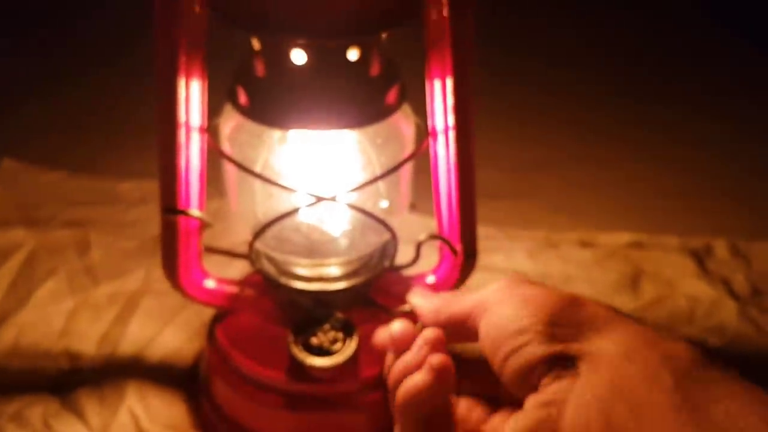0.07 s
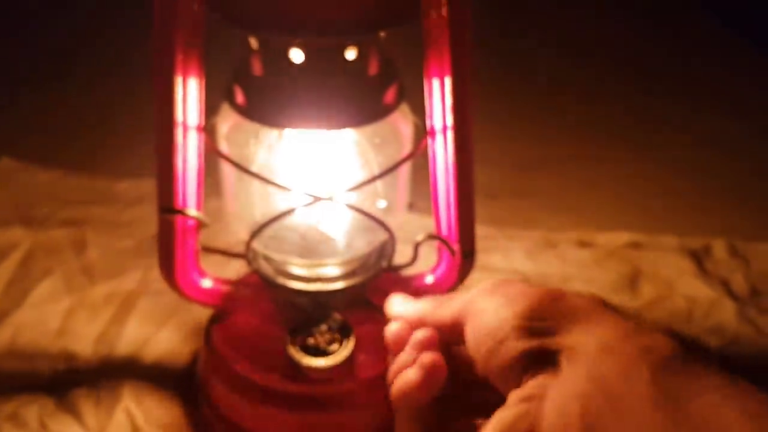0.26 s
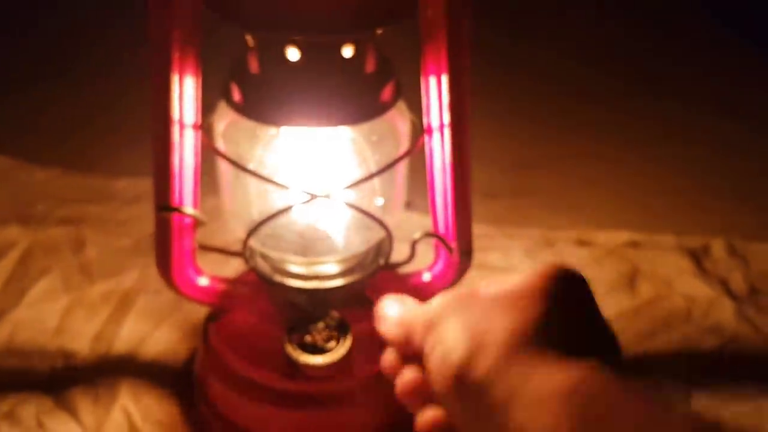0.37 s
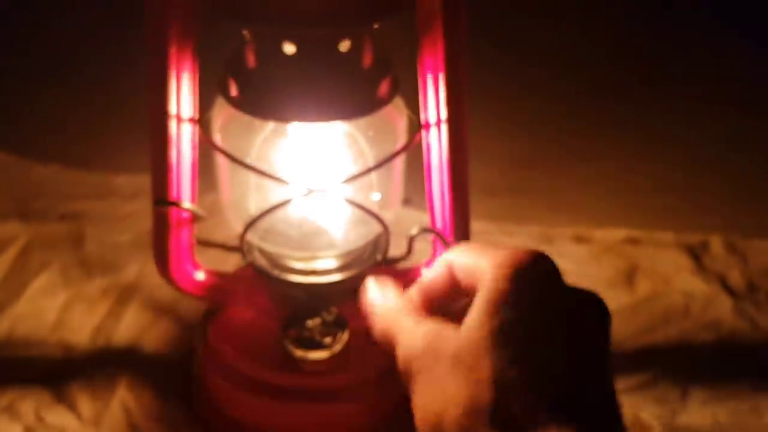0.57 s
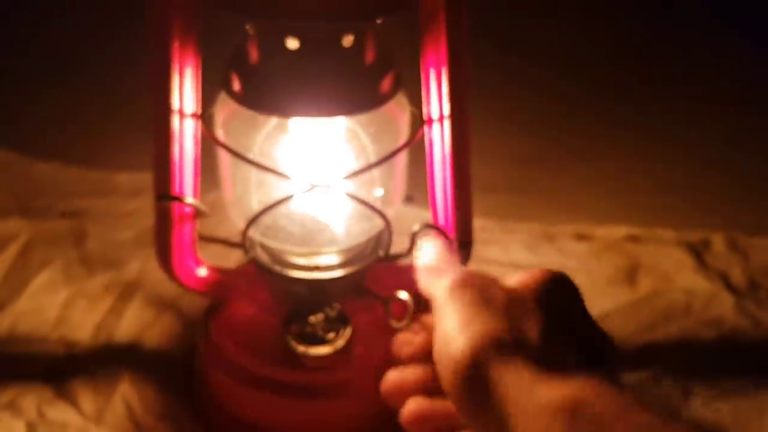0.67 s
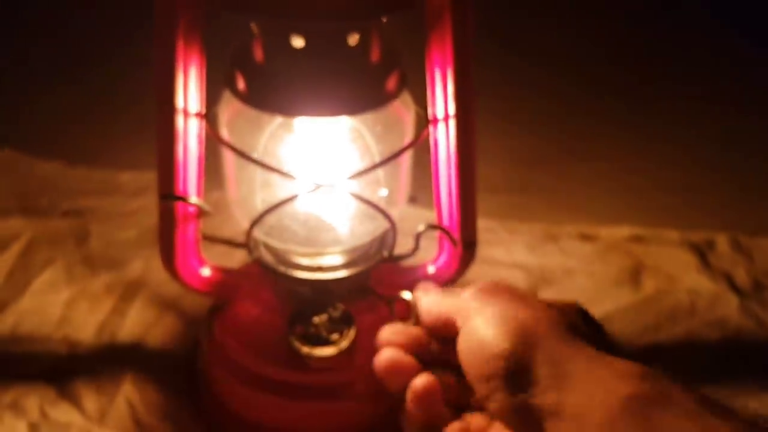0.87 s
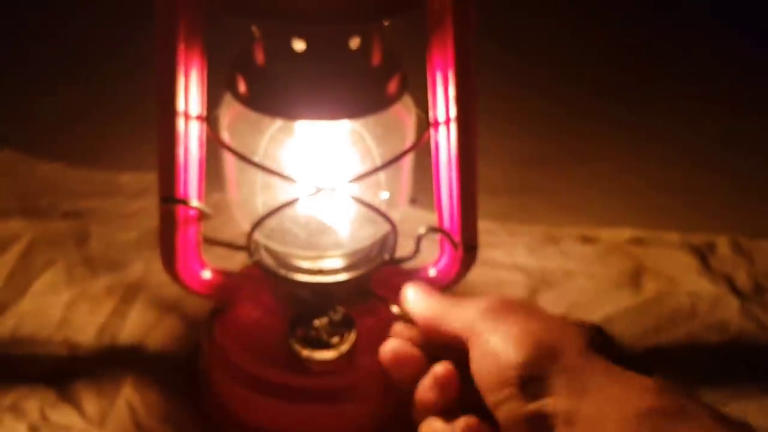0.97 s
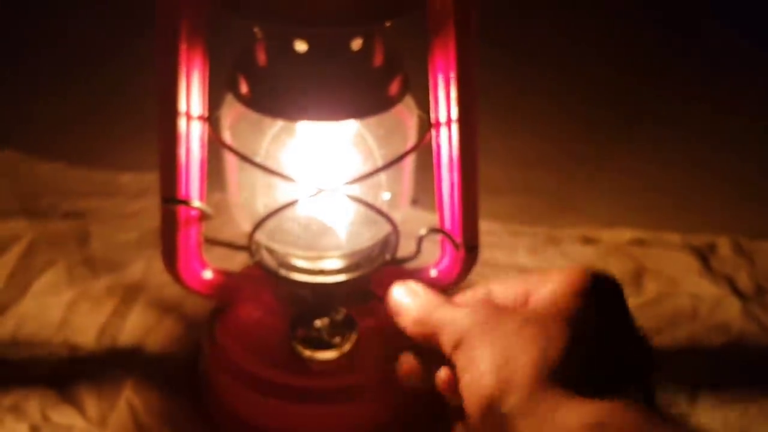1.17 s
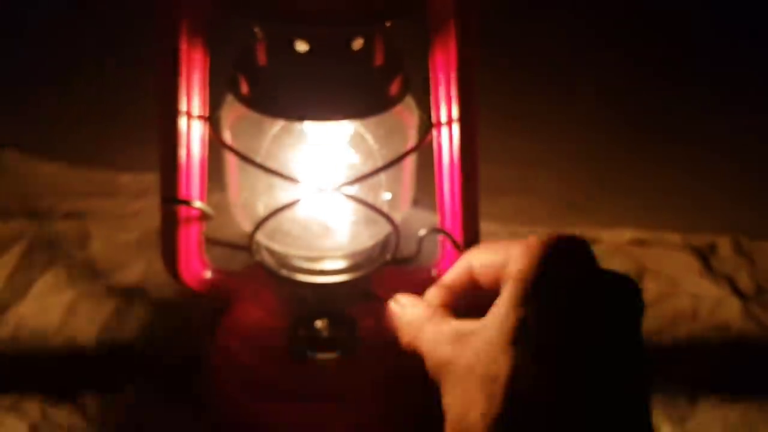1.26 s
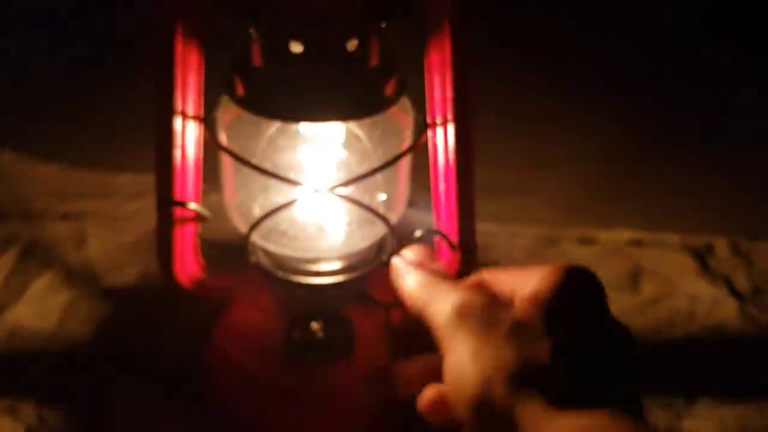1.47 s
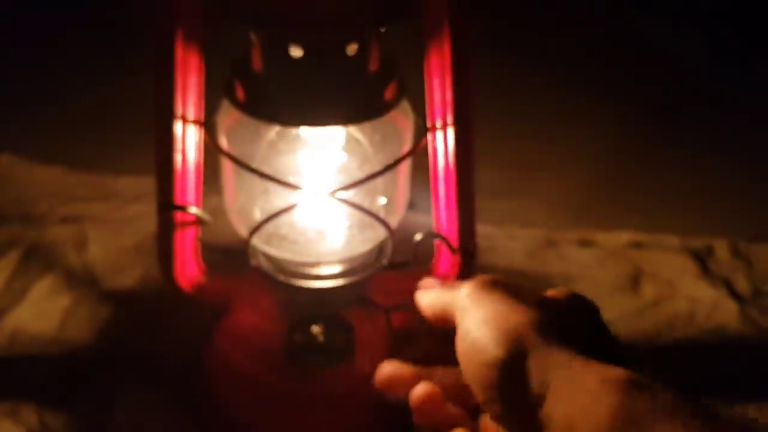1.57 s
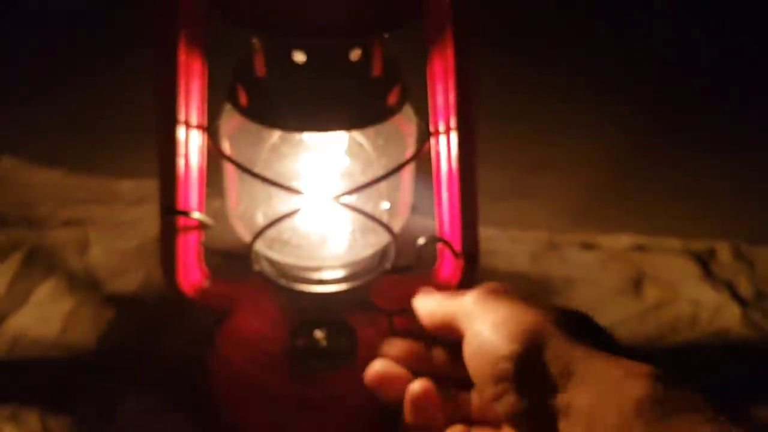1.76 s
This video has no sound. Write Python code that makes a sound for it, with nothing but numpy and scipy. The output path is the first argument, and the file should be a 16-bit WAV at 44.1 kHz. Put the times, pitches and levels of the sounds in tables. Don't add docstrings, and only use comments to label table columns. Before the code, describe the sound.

Lantern knob ratchets with a hard burst of metal ticks, then a soft knock and faint clicks

```python
import sys
import numpy as np
from scipy import signal
from scipy.fft import rfft, irfft
from scipy.io import wavfile

SR = 44100
rng = np.random.default_rng(int(sys.argv[2]) if len(sys.argv) > 2 else 0)


def inscribe(sig):
    pcm = np.round(np.clip(np.atleast_2d(sig).T, -1, 1) * 32767)
    wavfile.write(sys.argv[1], SR, pcm.astype(np.int16))


def volts_from_db(level):
    exponent = np.asarray(level, float) / 20
    return 10 ** exponent


N = 79380

# (time [s], frame [dB], tank [dB], knob [dB], snap [dB])
RATCHET_SLIPS = [(0.216, -39, -58, -45, -63.5), (0.2255, -42, -56, -49, -66),
                 (.230, -29.5, -45, -28, -30.5), (.232, -20, -33.5, -24.5, -25.5),
                 (0.2342, -29.5, -43.5, -21, -18), (0.2358, -33.5, -45.5, -24, -22.5),
                 (.238, -30.5, -38, -28, -39.5), (.243, -37.5, -45, -38, -37.5),
                 (.253, -29, -52, -36, -41.5), (0.656, -46, -62, -37.5, -35),
                 (0.944, -67.5, -75.5, -71.5, -76), (0.9711, -45.5, -61, -52, -53.5),
                 (0.974, -53, -53.5, -54, -54), (.981, -55.5, -53.5, -62.5, -55),
                 (1.2404, -49.5, -73.5, -52.5, -78.5), (1.254, -54, -67.5, -62, -77.5),
                 (1.267, -54, -72.5, -62.5, -79.5), (1.29, -51, -69, -60.5, -78.5),
                 (1.346, -62.5, -78, -63.5, -80), (1.352, -61, -74, -66, -82)]
# (frequency [Hz], level [dB], t60 [s])
TANK_MODES = [(190, -10, 0.077), (256, -4, .12), (300.9, 2, 0.14), (400, -5, .05), (490, -6, 0.078),
              (613, -5, 0.11), (732, -5, 0.13)]
FRAME_MODES = [(1127, 2.5, .034), (1200, -3, 0.018), (1290, -5, 0.011), (1360, -9, 0.034),
               (1620, -16, 0.011), (1927, -8, 0.049), (2477, -6, .03)]
KNOB_MODES = [(2976, -1.5, .015), (3494, -4, .015), (3735, -8, 0.042), (3950, 1, .02), (4290, -3.5, .02),
              (4450, -1, .015), (5246, -5, .02), (6000, -5.5, 0.03), (6840, 0.5, .012)]
SNAP_MODES = [(7600, -6.5, 0.0082), (8600, -7, 0.004), (9080, -4.5, .008), (10500, 3, 0.005),
              (11670, 1, .007), (13630, -8.5, .006)]
PART_LEAN_DB = [7.4, 0.6, 12, 14]
PART_CRACK_DB = [-5.5, -3, 8.5, 8.5]
PART_RUB_DB = [-14.5, -4.5, -4, -24.5]
# (time [s], level [dB])
FINGER_RUB = [(0, -100), (.9, -94), (.96, -79.5), (1.05, -87.5), (1.225, -89.5), (1.245, -71.5),
              (1.30, -76), (1.37, -100), (1.5, -101), (1.64, -94.5), (1.7, -87.5), (1.78, -95)]
# (time [s], thud [dB], clink [dB])
FOOT_KNOCKS = [
    (0.6555, -41.5, -37.5),
    (.659, -32.5, -43),
    (.667, -41.5, -49),
    (.676, -41.5, -50),
    (0.699, -49, -69),
]
# (frequency [Hz], level [dB], t60 [s])
THUD_MODES = [(86, -13.5, 0.13), (182, -7.5, 0.072), (266, -2, 0.075), (299.5, 0, 0.1),
              (342, -20.5, 0.061), (456.5, -3.5, 0.094), (517, -3.5, 0.043), (619, -7.5, 0.11),
              (830, -8, 0.097)]
FOOT_MODES = [(1530, -12, .015), (2170, -5.5, 0.019), (3446, -3, 0.07), (3580, -4.5, 0.02),
              (4880, -3, 0.02), (6360, -1.5, 0.061), (7000, -2.5, 0.047), (7770, -4.5, 0.024)]
# (frequency [Hz], t60 [s])
ROOM_DECAY = [(150, 0.52), (400, .5), (1040, 0.51), (2760, .5), (7280, 0.44), (12500, 0.4059),
              (14500, 0.32)]
# (frequency [Hz], level [dB])
ROOM_TONE = [(80, -9), (280, -2), (450, -1.5), (1100, -5.5), (2200, 1.5), (3800, 1), (6000, -3.5),
             (12500, -4)]
# (frequency [Hz], correlation [-1..1])
STEREO_LIKENESS = [(30, .9), (250, 0.77), (700, 0), (2000, 0), (8000, 0)]
# (time [s], level [dB])
CHIMNEY_SWELL = [(0, -100), (.4, -90.5), (.66, -74), (1.0, -73), (1.3, -76.5), (1.8, -87)]
# (frequency [Hz], width [Hz], level [dB], centre time [s], spread [s])
DRONES = [
    (56, 12, -70.5, .2, .25),
    (107.5, 16, -63.5, .93, .13),
    (71.8, 15.5, -64, 1.55, 0.16),
    (1835, 88, -84.5, 1.15, 0.26),
    (766, 135, -72.5, 1.29, 0.072),
    (1360, 90, -83.5, 1.702, 0.042),
]
# (frequency [Hz], level [dB])
RUMBLE_TONE = [(25, -24), (50, -5.5), (70, -0.5), (120, 1.5), (200, -10.5), (260, -13.5), (400, -25),
               (800, -23.5)]
# (frequency [Hz], level [dB])
HISS_TONE = [(600, 1), (1200, -3.5), (2500, -2.5), (5000, -6.5), (8000, -10), (11500, -2.5), (14800, -6.5)]


def lantern():
    parts = knob_slips() + table_knocks()
    lean_db = list(PART_LEAN_DB) + [5, 9]
    left = sum(part * volts_from_db(db / 2) for part, db in zip(parts, lean_db))
    right = sum(part * volts_from_db(-db / 2) for part, db in zip(parts, lean_db))
    right_lag_s = .00009
    samples = np.arange(N)
    right = np.interp(samples - right_lag_s * SR, samples, right)
    return np.array([left, right]), sum(parts)


def knob_slips():
    rub_per_s = 1300
    grains = (rng.random(N) < rub_per_s / SR) * rng.standard_normal(N)
    grains = grains * volts_from_db(in_time(FINGER_RUB))
    s, frame_db, tank_db, knob_db, snap_db = np.transpose(RATCHET_SLIPS)
    modes = [TANK_MODES, FRAME_MODES, KNOB_MODES, SNAP_MODES]
    hits_db = [tank_db - 8.5, frame_db - 5.5, knob_db - 7, snap_db - 8]
    return [struck_part(part_modes, s, db, crack_db, grains * volts_from_db(rub_db))
            for part_modes, db, crack_db, rub_db in zip(modes, hits_db, PART_CRACK_DB, PART_RUB_DB)]


def table_knocks():
    s, thud_db, clink_db = np.transpose(FOOT_KNOCKS)
    no_rub = np.zeros(N)
    thud = struck_part(THUD_MODES, s, thud_db - 7, -4, no_rub)
    clink = struck_part(FOOT_MODES, s, clink_db - 7, 15.5, no_rub)
    return [thud, clink]


def struck_part(modes, s, hits_db, crack_db, rub):
    burst_s, ticks_per_burst, tick_fade_db = .003, 9, 15
    chance = rng.random((len(s), 2, ticks_per_burst))
    late = chance[:, 0] ** 2
    at = ((s[:, None] + burst_s * late) * SR).astype(int)
    ticks = volts_from_db(hits_db[:, None] - tick_fade_db * late) * (chance[:, 1] + 0.33)
    dry_ticks = rub.copy()
    np.add.at(dry_ticks, at, ticks * rng.choice([-1, 1], at.shape))

    ringing = np.zeros(N)
    for hz, mode_db, t60 in modes:
        clicks = rub.copy()
        strength = volts_from_db(hits_db + rng.normal(0, 1.5, len(s)))
        np.add.at(clicks, at.min(axis=1), strength * rng.choice([-1, 1], len(s)))
        ringing += volts_from_db(mode_db) * ring(clicks, hz, t60)

    lowest_hz, highest_hz = modes[0][0], modes[-1][0]
    crack = signal.sosfilt(bandpass(4, lowest_hz * .8, highest_hz * 1.05), dry_ticks + 1e-18)
    return ringing + volts_from_db(crack_db) * crack * SR / highest_hz / 2


def room(x):
    gap_s, rise_s = .003, .006
    echo_db, wash_db = -4.5, -4
    t, echo, wash = np.arange(N) / SR, 0, 0
    white = rng.standard_normal((2, 2, N))
    onset = np.clip((t - gap_s) / rise_s, 0, 1)
    edges = 60 * 2 ** np.arange(0, 8.3, 1 / 3)
    for k, (low, high) in enumerate(zip(edges, edges[1:])):
        hz = np.sqrt(low * high)
        sos = bandpass(2, low, high)
        mid, side = white[k % 2]
        band = signal.sosfilt(sos, spread_stereo(mid, side, hz))
        decay_db = at_hz(ROOM_TONE, hz) - 60 * t / at_hz(ROOM_DECAY, hz)
        decay = onset * volts_from_db(decay_db) / np.sqrt(SR / 20)
        echo = echo + band * decay
        energy = signal.fftconvolve(signal.sosfilt(sos, x) ** 2, decay ** 2)[:N]
        wash = wash + rms_one(band[:, ::-1]) * np.sqrt(np.maximum(energy, 0))
    echoes = signal.fftconvolve(echo[:, :SR], x[None], axes=1)[:, :N]
    return volts_from_db(echo_db) * echoes + volts_from_db(wash_db) * wash


def background():
    tones = chimney() + far_drones()
    rumble = volts_from_db(-67) * stereo_noise(RUMBLE_TONE)
    hiss = volts_from_db(-77) * stereo_noise(HISS_TONE)
    return tones * volts_from_db(np.array([[.6], [-.6]])) + rumble + hiss


def chimney():
    return volts_from_db(in_time(CHIMNEY_SWELL)) * narrow_noise(572.3, width_hz=64)


def far_drones():
    t, drones = np.arange(N) / SR, np.zeros(N)
    for hz, width_hz, db, centre, spread in DRONES:
        swell = np.exp(-.5 * ((t - centre) / spread) ** 2)
        drones += volts_from_db(db) * swell * narrow_noise(hz, width_hz)
    return drones


def stereo_noise(spectrum):
    hz = np.maximum(np.fft.rfftfreq(N, 1 / SR), 1)
    mid, side = rfft(rng.standard_normal((2, N)))
    below, above = (spectrum[0][0] / 2, -90), (spectrum[-1][0] * 1.1, -90)
    colour = volts_from_db(at_hz([below] + list(spectrum) + [above], hz))
    return rms_one(irfft(colour * spread_stereo(mid, side, hz), N))


def spread_stereo(mid, side, hz):
    alike = np.clip(at_hz(STEREO_LIKENESS, hz), -1, 1)
    return np.sqrt(1 + alike) * mid + np.sqrt(1 - alike) * side * np.array([[1], [-1]])


def narrow_noise(hz, width_hz):
    x = rng.standard_normal(N + SR)
    for _ in range(2):
        x = ring(x, hz, np.log(1000) / np.pi / width_hz)
    return rms_one(x[SR:])


def ring(clicks, hz, t60):
    r = volts_from_db(-60 / (t60 * SR))
    w = 2 * np.pi * hz / SR
    return signal.lfilter([0, np.sin(w)], [1, -2 * r * np.cos(w), r * r], clicks + 1e-18)


def bandpass(order, low_hz, high_hz):
    return signal.butter(order, [low_hz, high_hz], "band", fs=SR, output="sos")


def rms_one(x):
    return x / np.sqrt(np.mean(x ** 2) + 1e-20)


def at_hz(points, hz):
    table_hz, values = np.transpose(points)
    return np.interp(np.log(hz), np.log(table_hz), values)


def in_time(rows):
    return np.interp(np.arange(N) / SR, *np.transpose(rows))


def scene():
    direct, mono = lantern()
    return direct + room(mono) + background()


def band_limit(x):
    return signal.sosfilt(signal.butter(12, 16250, fs=SR, output="sos"), x)


def record(dry):
    mic_cut_hz = 14800
    mix = signal.sosfilt(signal.butter(6, mic_cut_hz, fs=SR, output="sos"), dry)
    return band_limit(mix)


dry = scene()
out = record(dry)
inscribe(out)
```